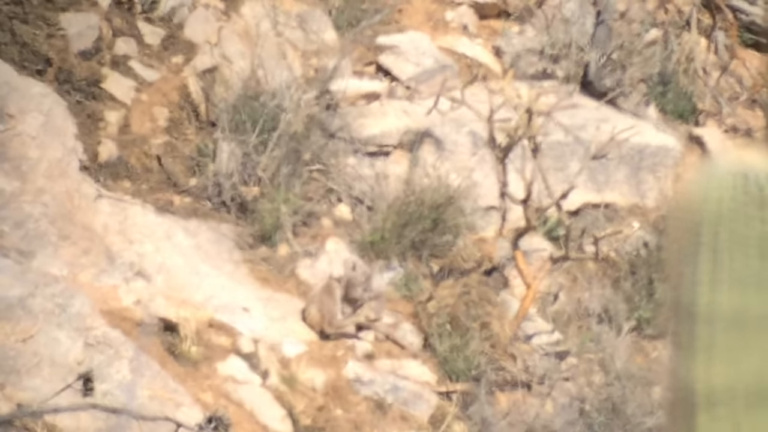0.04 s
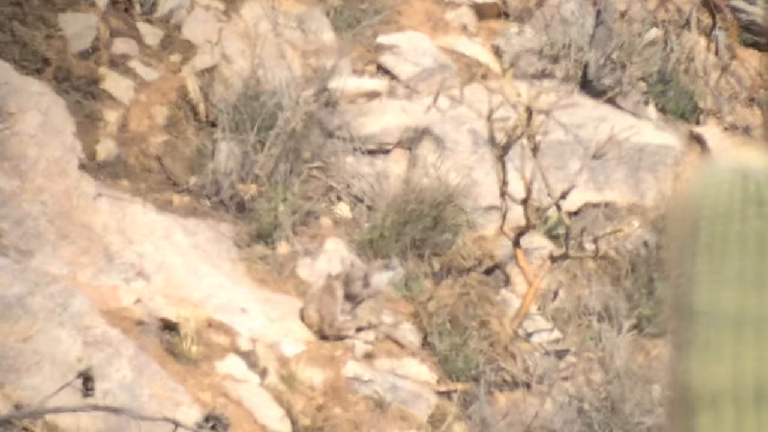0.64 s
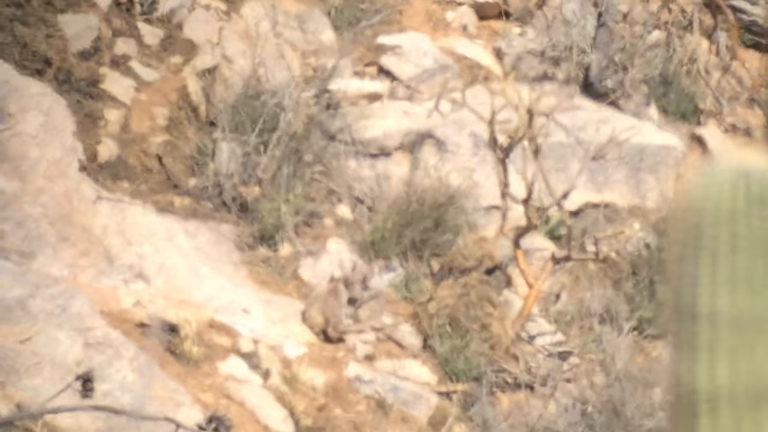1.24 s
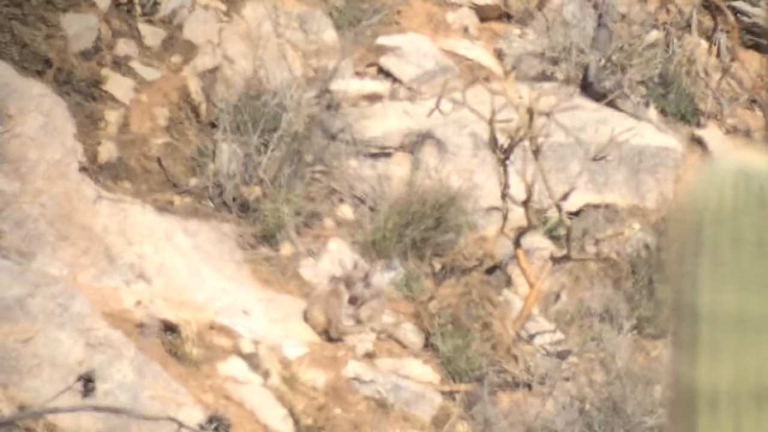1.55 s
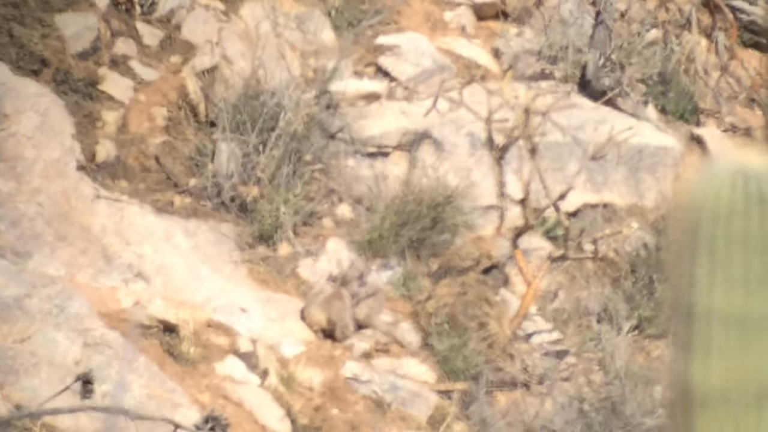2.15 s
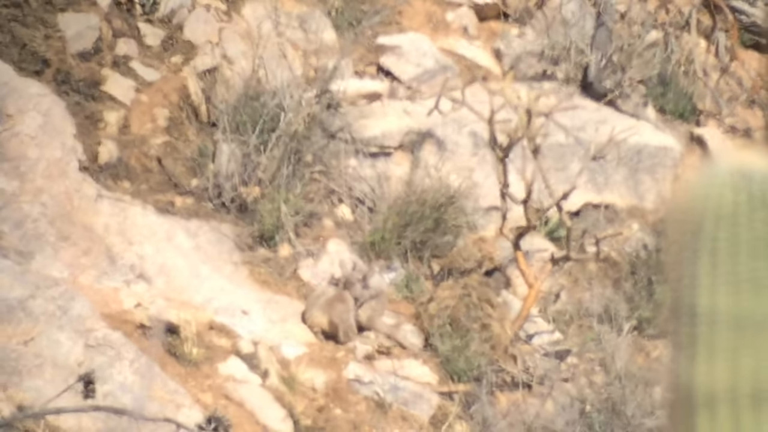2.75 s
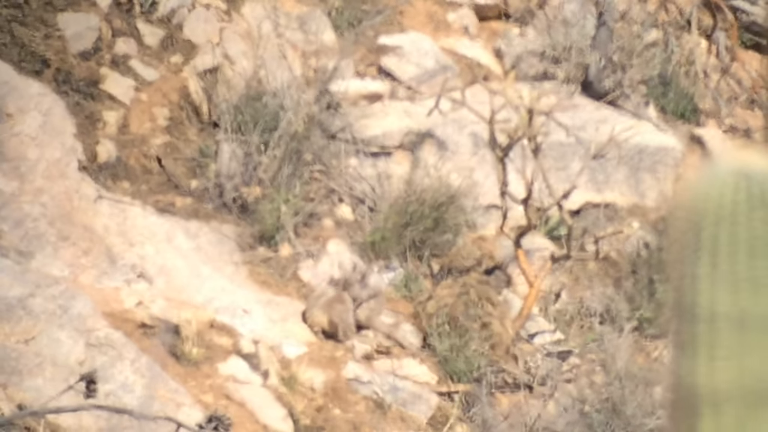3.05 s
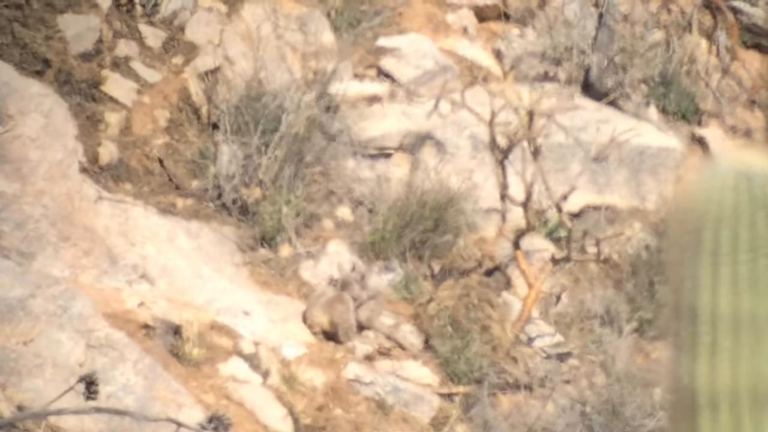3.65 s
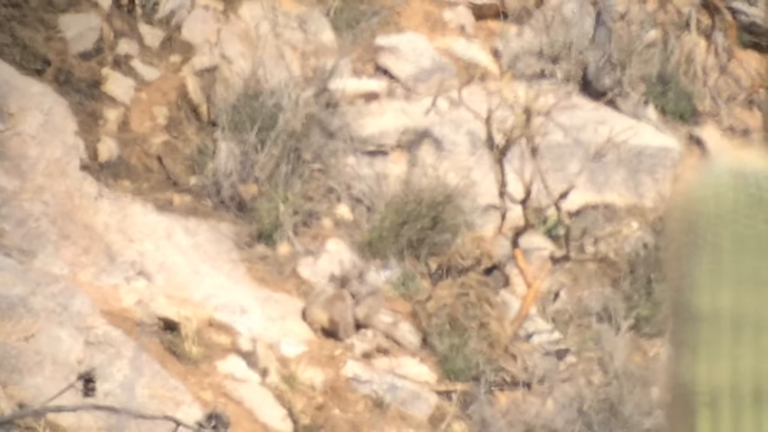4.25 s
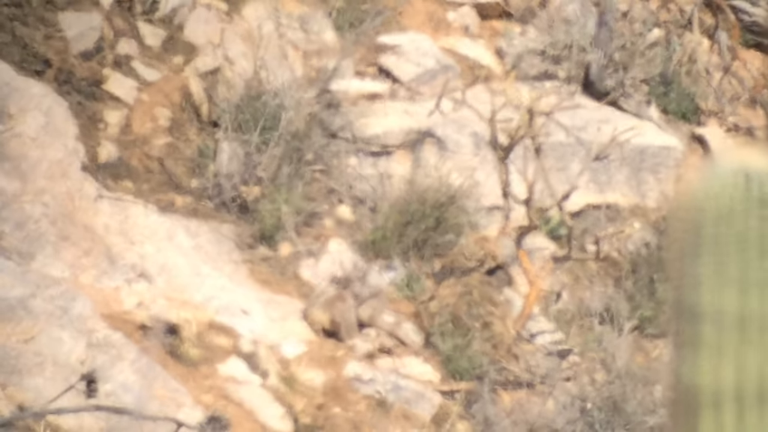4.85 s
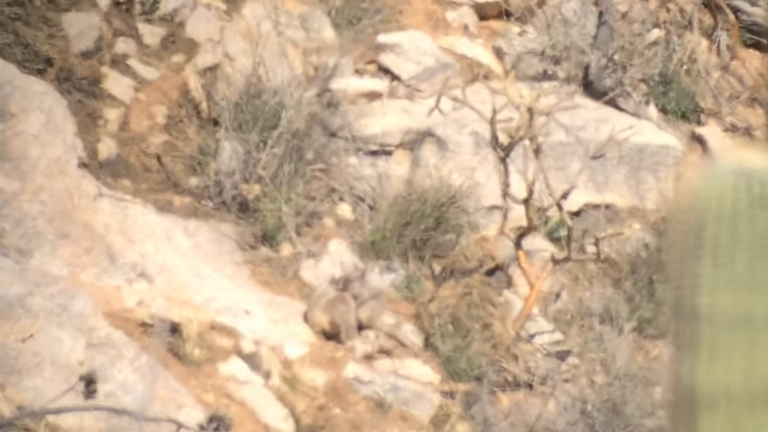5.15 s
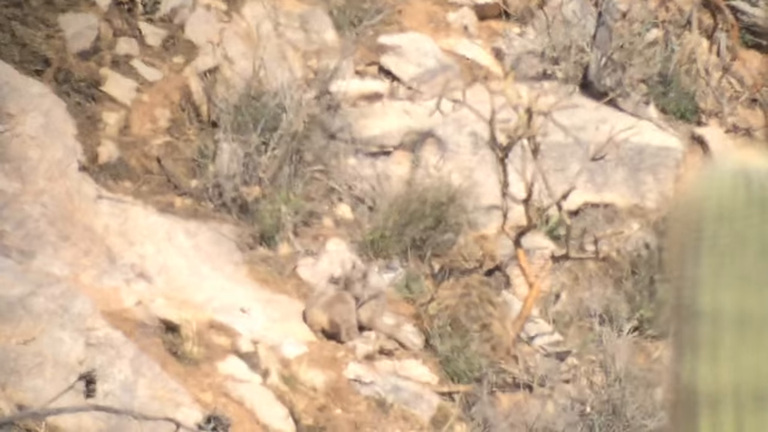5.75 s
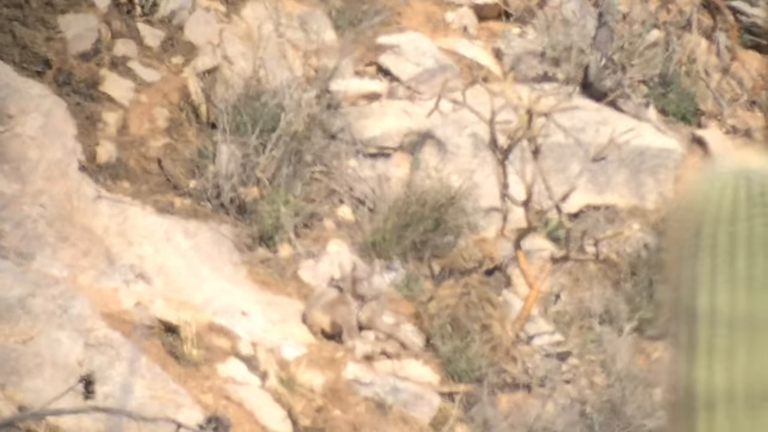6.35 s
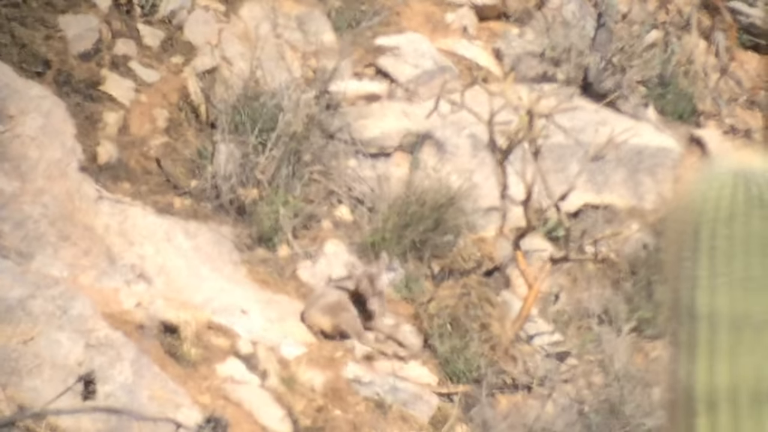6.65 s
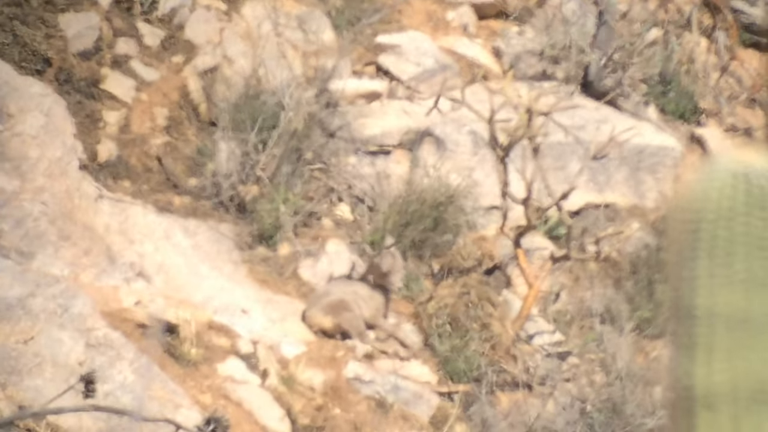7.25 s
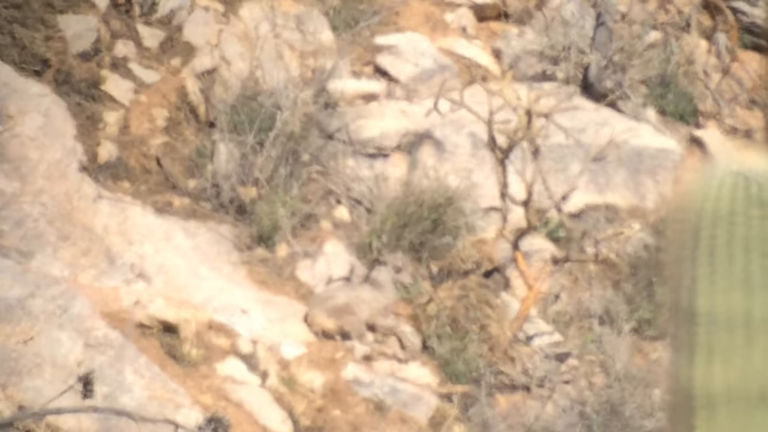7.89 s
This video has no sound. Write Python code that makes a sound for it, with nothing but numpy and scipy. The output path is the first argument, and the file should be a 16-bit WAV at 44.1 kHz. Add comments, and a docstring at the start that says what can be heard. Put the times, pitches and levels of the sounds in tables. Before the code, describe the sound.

Two main gusts of wind hit the microphone up close, low and fluttering, the second one louder, with soft thumps and small puffs before and after. The desert slope around is otherwise very quiet, just a soft airy hush and slight microphone hiss. A distant engine hums faintly between the gusts and comes back as the wind dies down.

```python
"""Wind buffets a small microphone on a quiet, rocky desert hillside.
Slow swirls rumble on the port and passing eddies thump it softly; two main gusts, the second
stronger, break up into a rough flutter of small, fast swirls. Behind the wind lie a faint, far
engine drone that swells three times, the steady hush of open air and the microphone's own hiss."""
import sys
import numpy as np
from scipy import signal
from scipy.fft import rfft, irfft, next_fast_len
from scipy.io import wavfile
from scipy.ndimage import uniform_filter1d

SR = 44100
rng = np.random.default_rng(int(sys.argv[2]) if len(sys.argv) > 2 else 0)


def materialize(psi):
    """Save the field psi as 16-bit PCM at rate SR to the path in sys.argv[1].

    A 1-D psi becomes a single channel; in a 2-D psi each row is a channel.
    """
    bounded = np.clip(np.atleast_2d(psi).T, -1, 1)
    quanta = np.round(bounded * 32767).astype(np.int16)
    wavfile.write(sys.argv[1], SR, quanta)


N = 349272


def wind():
    """Turbulence on the port: a rumble of large, slow swirls, eddy thumps and a flutter on top."""
    # spectrum of the buffeting: f/Hz, relative level/dB
    buffet_spectrum = [(20, -8), (40, -14.5), (65, 1), (95, 1.5), (140, -4), (190, -9.5), (250, -17),
                       (320, -20.5), (400, -29.5), (600, -35), (1200, -65)]
    buffet_db, flutter_db = gusts()
    # the rumble arrives in lumps, with short lulls between them
    swirl = evened(coloured_noise(buffet_spectrum) * from_db(3 * drift(rate_hz=25)), span_s=0.06)
    rumble = driven(swirl, from_db(buffet_db + 3.48), split_hz=160, bright_db=-46, brightening=0.35)
    thumps, wakes = eddies(buffet_db)
    return rumble + from_db(-0.6) * thumps + flutter(swirl, flutter_db + 0.34, wakes)


def gusts():
    """Buffet and flutter envelopes in dB: each gust rises fast, holds and dies away over a breeze."""
    # gusts at the port: arrival t/s, hold/s, relative buffet level/dB, relative flutter level/dB,
    # fade/(dB/s)
    gust_cues = [(-0.012, 0.13, -48.5, -76, 104), (0.783, 0.042, -54.5, -74, 30),
                 (1.205, 0.031, -46, -68, 108), (1.399, 0.12, -44.5, -63, 100),
                 (1.55, .06, -42.5, -57, 194), (1.72, 0.015, -48, -58, 122), (2.353, 0.091, -59, -84, 70),
                 (3.443, .02, -47, -74, 105), (3.582, .15, -43, -56, 105), (3.775, 0.18, -38.5, -48, 161),
                 (4.021, 0.013, -38.5, -43.5, 128), (4.105, 0.17, -38, -46.5, 88),
                 (4.4, 0.045, -41, -50.5, 72), (4.542, .015, -47, -55, 55), (4.847, .02, -53, -76, 74),
                 (4.993, 0.1, -55, -75, 50), (5.35, 0.083, -57, -79, 49), (6.205, 0.014, -55.5, -73.5, 132),
                 (6.349, 0.017, -61, -75, 150), (7.886, .03, -59, -82, 60)]
    rise_db_per_s, settle_db_per_s = 279, 1.0
    flutter_steepness = 1.65   # flutter comes and goes faster than the buffeting
    t = np.arange(N) / SR
    buffet_db = -64 - settle_db_per_s * t + 4.5 * drift(rate_hz=9)   # light breeze in small puffs
    flutter_db = np.full(N, -np.inf)
    for start_s, hold_s, buffet_top_db, flutter_top_db, fade_db_per_s in gust_cues:
        below_db = rise_db_per_s * np.maximum(start_s - t, 0)
        below_db += fade_db_per_s * np.maximum(t - start_s - hold_s, 0)
        buffet_db = np.maximum(buffet_db, buffet_top_db - below_db)
        flutter_db = np.maximum(flutter_db, flutter_top_db - flutter_steepness * below_db)
    return buffet_db, flutter_db


def eddies(buffet_db):
    """Each vortex passing the port thumps it with a pressure swing; returns thumps and wake envelope."""
    # large eddies: t/s, relative peak level/dB, centre f/Hz
    eddy_cues = [(0.164, -36, 109), (0.505, -40.5, 85), (0.689, -39.5, 72), (0.793, -35, 97),
                 (0.864, -39, 84), (0.977, -42.5, 123), (1.221, -29.5, 128), (1.54, -35, 126),
                 (1.6, -22, 147), (1.698, -32, 105), (2.112, -39.5, 110), (2.331, -44, 86),
                 (2.402, -38.5, 76.5), (3.138, -48.5, 160), (3.217, -46, 98), (3.32, -47, 84),
                 (3.466, -22.5, 85), (3.59, -26.5, 120), (3.675, -28.5, 122), (3.825, -21, 141),
                 (3.854, -21.5, 133), (3.915, -19, 126), (4.225, -16.5, 170), (4.548, -34, 139),
                 (5.032, -35.5, 115), (5.187, -40, 71.5), (5.247, -41, 81), (5.376, -35, 82),
                 (6.066, -45, 83), (6.218, -38.5, 82), (6.387, -43.5, 83), (6.888, -37, 70)]
    steepness, wake_spread_s, stiff_wind_db = 4.87, 0.0083, -43
    thumps, wakes = np.zeros(N), np.zeros(N)
    for (pass_s, db, hz), phase in zip(eddy_cues, 2 * np.pi * rng.random(len(eddy_cues))):
        span = np.arange(max(int((pass_s - 0.06) * SR), 0), min(int((pass_s + 0.06) * SR), N))
        t = span / SR - pass_s
        # the pressure falls off as a power of the distance from the core; small vortices pass faster
        swing = (1 - 2j * np.pi * hz * t / steepness) ** -(steepness + 1)
        thumps[span] += from_db(db) * np.real(swing * np.exp(1j * phase))
        # the wake is stronger behind small, fast eddies and in a stiff wind
        wake_db = -34 + 17.5 * np.log2(hz / 102) + np.maximum(buffet_db[span] - stiff_wind_db, 0)
        wakes[span] += from_db(db + wake_db) * np.exp(-0.5 * (t / wake_spread_s) ** 2)
    return thumps, wakes


def flutter(swirl, level_db, wakes):
    """Small, fast swirls burst from the crests of the large ones and in the wake of each eddy."""
    # spectrum of the flutter: f/Hz, relative level/dB
    flutter_spectrum = [(120, -18.5), (220, 3.5), (310, 1.5), (365, 1), (450, 4.5), (620, -4.5), (800, -13),
                        (1000, -13), (1280, -24.5), (1650, -27), (2100, -43.5), (3000, -83)]
    crest_share = 0.49
    crests = np.sqrt(1 - crest_share + crest_share * swirl ** 2)
    bursts = evened(crests * from_db(1.5 * drift(rate_hz=31)), span_s=0.045)
    force = np.hypot(from_db(level_db) * bursts, wakes)
    return driven(coloured_noise(flutter_spectrum), force, split_hz=640, bright_db=-41, brightening=0.46)


def driven(noise, force, split_hz, bright_db, brightening):
    """Scale noise by the force of the flow; a stronger flow holds more small, bright swirls."""
    lows = signal.sosfiltfilt(signal.butter(2, split_hz, fs=SR, output="sos"), noise)
    highs_gain = np.clip(force / from_db(bright_db), 0.05, 2) ** brightening
    return force * (lows + highs_gain * (noise - lows))


def far_engine():
    """A dull rumble and a few low tones, blurred and wavering after their long way through moving air."""
    # swells carried on the wind: peak t/s, spread/s, rumble level/dB, overall tone level/dB
    swells = [(3.0, 0.24, -64, -66), (6.77, 0.066, -67.5, -66), (7.62, 0.34, -64.5, -61.5)]
    # engine tones: f/Hz, width/Hz, relative level/dB
    partials = [(154.8, 17, -4), (169.6, 3.3, -1), (278.6, 4.1, -13), (542, 6.6, -27)]
    # spectrum of the engine rumble: f/Hz, relative level/dB
    rumble_spectrum = [(60, -11), (100, -1.5), (160, -4.5), (205, -4.5), (255, -18), (380, -16),
                       (600, -35.5)]
    t, tones = np.arange(N) / SR, np.zeros(N)
    rumble_gain, tones_gain = from_db(-80), from_db(-85)   # between the swells
    for peak_s, spread_s, rumble_db, tones_db in swells:
        swell = np.exp(-0.5 * ((t - peak_s) / spread_s) ** 2)
        rumble_gain = np.hypot(rumble_gain, from_db(rumble_db) * swell)
        tones_gain = np.hypot(tones_gain, from_db(tones_db) * swell)
    for hz, width_hz, db in partials:
        waver = drift(width_hz / 2) + 1j * drift(width_hz / 2)
        tone = np.real(waver * np.exp(2j * np.pi * hz * t))
        tones += from_db(db) * evened(tone, span_s=0.29)
    return rumble_gain * coloured_noise(rumble_spectrum) + tones_gain * tones


def hillside_air():
    """The soft, steady hush of air moving over distant slopes."""
    # spectrum of the open air: f/Hz, relative level/dB
    air_spectrum = [(25, -11.5), (60, -0.5), (140, -2.5), (220, -8.5), (320, -11.5), (440, -10), (700, -17),
                    (1000, -22.5), (1600, -26.5), (3000, -43)]
    return from_db(-70) * coloured_noise(air_spectrum)


def microphone_hiss():
    """The microphone's own faint, broad noise floor."""
    # spectrum of the hiss: f/Hz, relative level/dB
    hiss_spectrum = [(200, 0), (2000, 2), (4000, -0.5), (6500, -1), (7400, -1), (8100, -3), (11000, -5),
                     (15000, -7)]
    return from_db(-79) * coloured_noise(hiss_spectrum)


def coloured_noise(spectrum):
    """Unit-power noise shaped by an EQ curve of (f/Hz, level/dB) points."""
    hz, db = np.transpose(spectrum)
    size = next_fast_len(N)
    bins = np.maximum(np.fft.rfftfreq(size, 1 / SR), 1)
    gain = from_db(np.interp(np.log(bins), np.log(hz), db))
    gain *= np.minimum(bins / hz[0], 1) ** 2 * np.minimum(hz[-1] / bins, 1) ** 2   # both ends roll off
    return unit_power(irfft(rfft(rng.standard_normal(size)) * gain, size)[:N])


def drift(rate_hz):
    """Smooth random modulation of unit power, changing about rate_hz times a second."""
    hop, run_in = 40, 2000   # samples per control step; steps for the filter to settle
    pole = np.exp(-2 * np.pi * rate_hz * hop / SR)
    steps = rng.standard_normal(N // hop + run_in + 2)
    slow = signal.lfilter([1], [1, -2 * pole, pole * pole], steps)[run_in:]
    return np.interp(np.arange(N) / hop, np.arange(len(slow)), unit_power(slow))


def evened(x, span_s):
    """Ride the gain towards unit power over each span; quicker lumps stay."""
    size = max(int(span_s * SR), 2)
    return x / np.sqrt(uniform_filter1d(uniform_filter1d(x ** 2, size), size) + 1e-9)


def unit_power(x):
    """Scale to an RMS of one."""
    return x / np.sqrt(np.mean(x ** 2) + 1e-20)


def from_db(db):
    """Decibels to gain."""
    return 10 ** (np.asarray(db) / 20)


def scene():
    """Wind on the port up front, the quiet landscape behind it, in mono."""
    return (wind() + far_engine() + hillside_air())[None]


def record(dry):
    """The microphone adds its hiss; a steep low-pass cuts the top."""
    cutoff_hz = 15250
    high_cut = signal.ellip(12, 0.1, 80, cutoff_hz, fs=SR, output="sos")
    return signal.sosfilt(high_cut, dry + microphone_hiss())


dry = scene()
out = record(dry)
materialize(out)
```